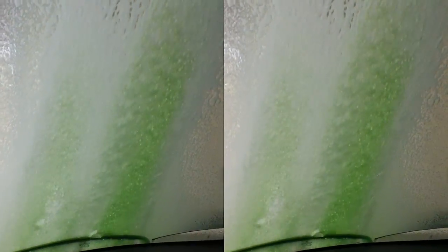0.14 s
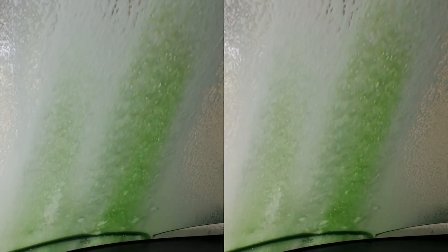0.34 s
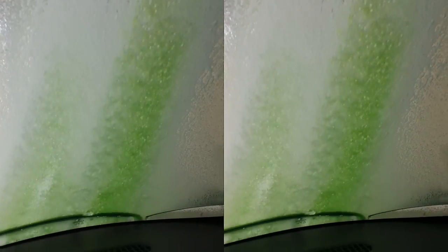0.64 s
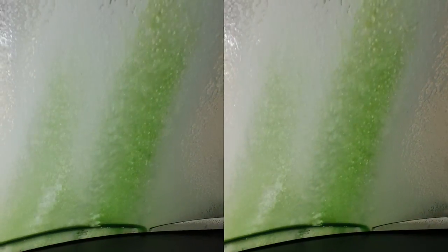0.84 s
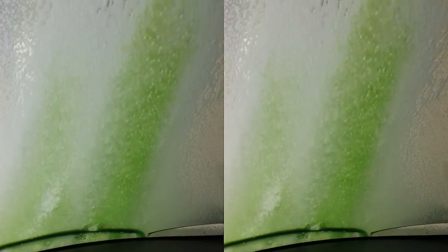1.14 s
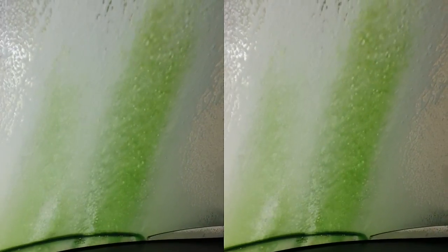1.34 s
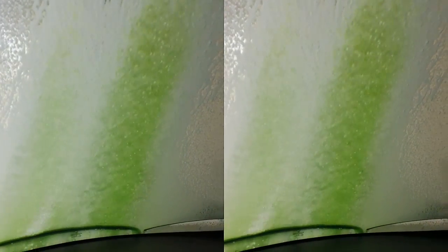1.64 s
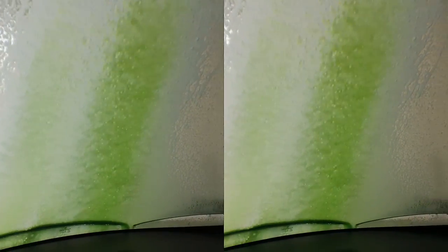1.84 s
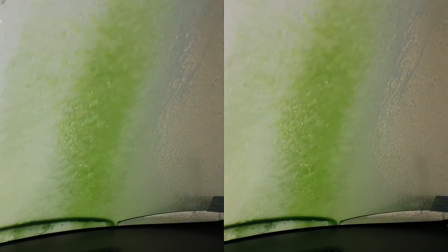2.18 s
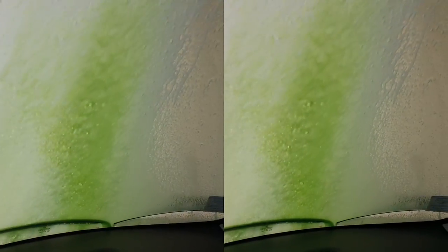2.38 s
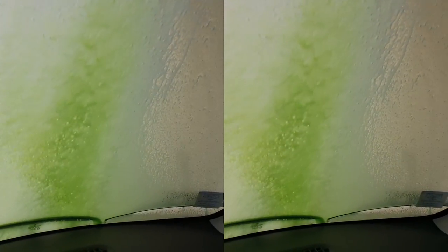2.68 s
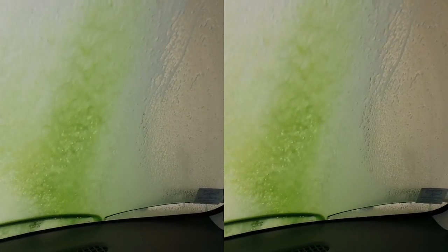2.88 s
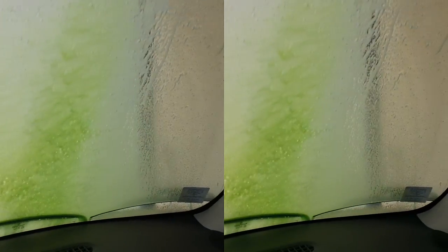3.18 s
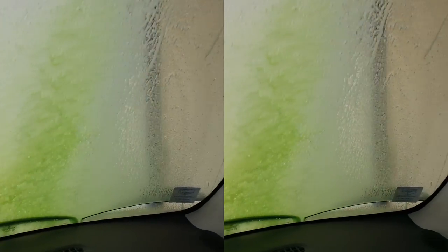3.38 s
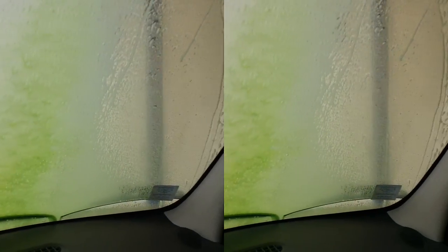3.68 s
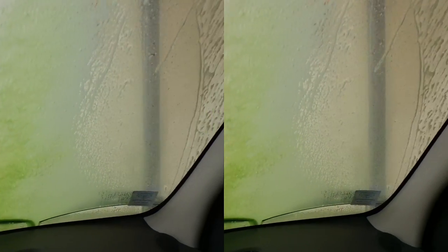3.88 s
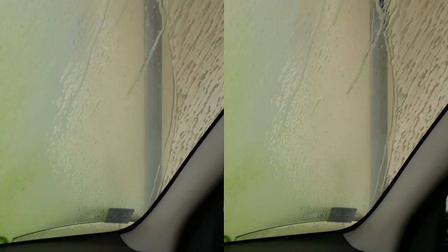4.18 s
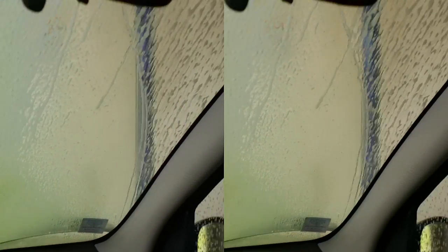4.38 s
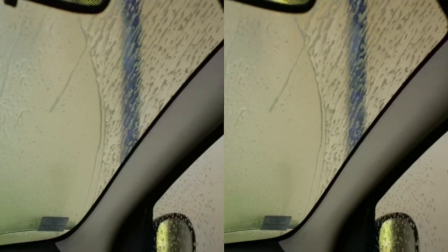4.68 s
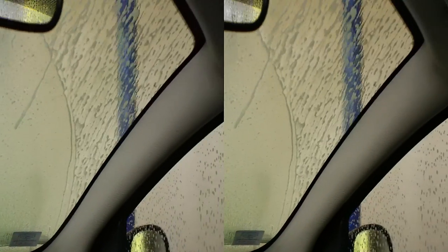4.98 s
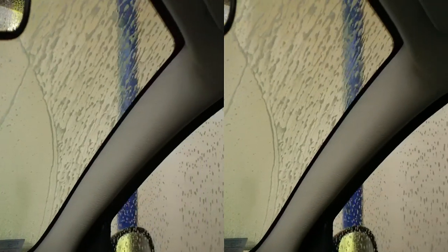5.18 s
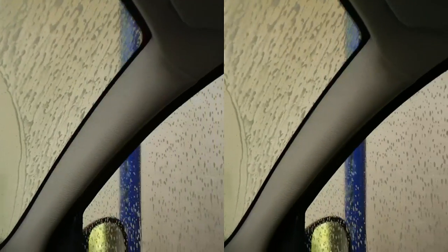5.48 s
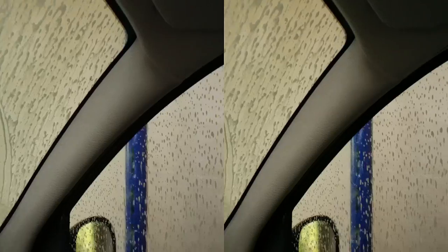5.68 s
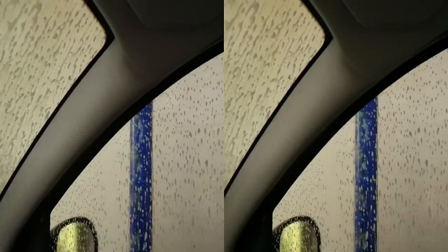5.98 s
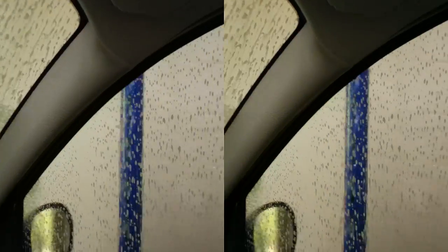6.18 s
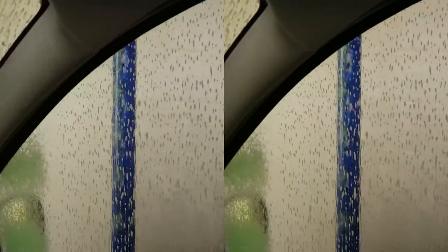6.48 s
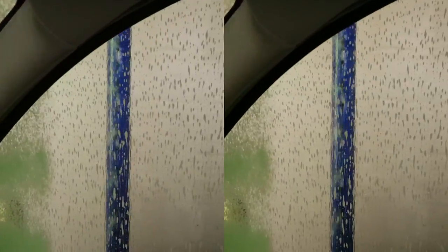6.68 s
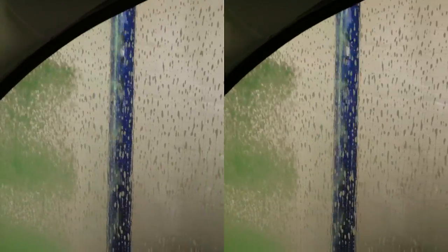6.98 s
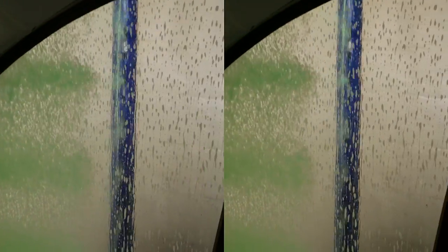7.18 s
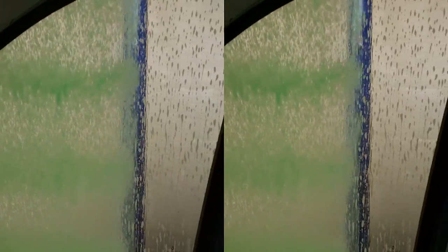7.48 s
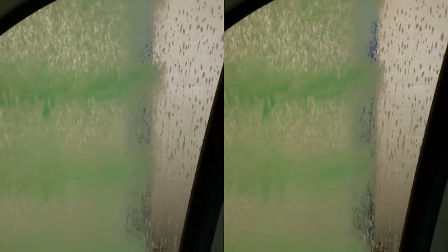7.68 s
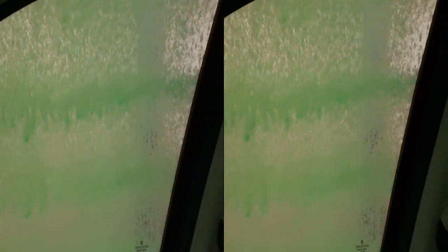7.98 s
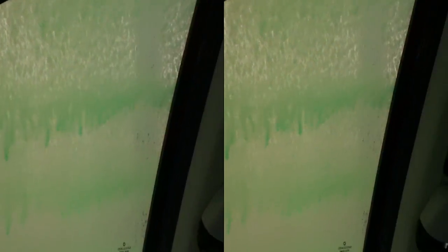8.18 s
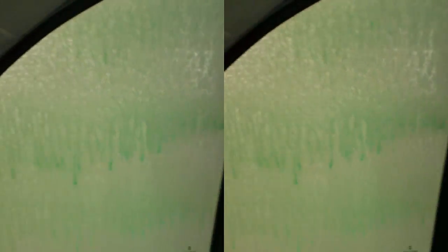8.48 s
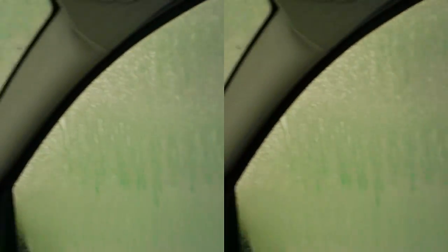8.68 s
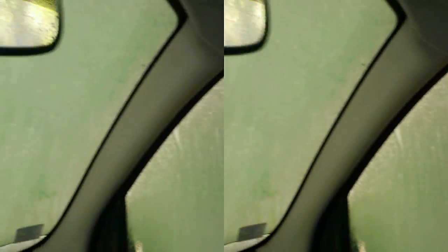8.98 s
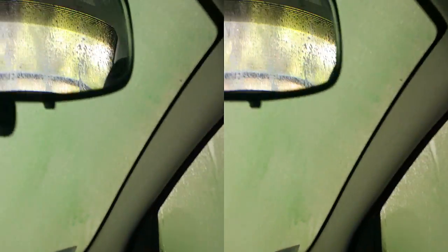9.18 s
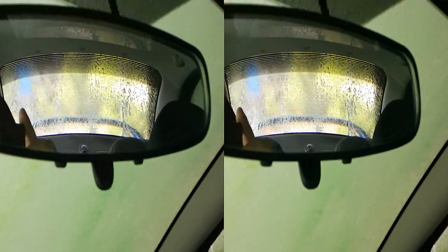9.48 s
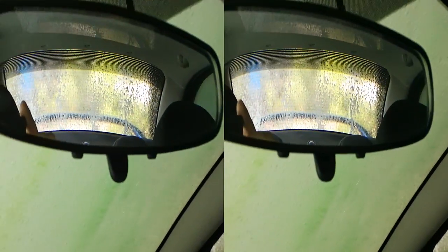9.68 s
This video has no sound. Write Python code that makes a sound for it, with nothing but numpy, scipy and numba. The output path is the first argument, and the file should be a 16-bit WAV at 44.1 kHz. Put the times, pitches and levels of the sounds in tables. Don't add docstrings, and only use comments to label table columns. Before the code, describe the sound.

Heard inside a closed car in a wash bay, water jets drum on the bodywork, then roar and hiss across the side window over a low machine hum.

```python
import sys
import numpy as np
from scipy import signal
from scipy.fft import rfft, irfft, next_fast_len
from scipy.io import wavfile
from scipy.ndimage import uniform_filter1d
from numba import njit

SR = 44100
rng = np.random.default_rng(int(sys.argv[2]) if len(sys.argv) > 2 else 0)


def nominal_scale(level):
    x = np.asarray(level, float) / 20
    return 10 ** x


def store_pcm(level_fs):
    pcm = np.round(np.clip(level_fs, -1, 1) * 32767).astype(np.int16)
    wavfile.write(sys.argv[1], SR, np.atleast_2d(pcm).T)


N = 434385
SIZE = next_fast_len(N)
HZ = np.maximum(np.fft.rfftfreq(SIZE, 1 / SR), 10)
TIME = np.arange(N) / SR

# (time [s], force on sheet metal [dB], force on glass [dB])
SPRAY = [(0, -38, -39), (1.4, -36, -39.5), (2.4, -40.5, -43), (2.9, -41, -46), (3.9, -42, -46),
         (4.95, -41, -47), (5.45, -36.5, -41), (5.68, -36.5, -36), (6.05, -35, -35.5), (6.45, -35.5, -32),
         (6.9, -36, -30.5), (7.2, -29, -31), (8.0, -28.5, -30), (8.27, -28.5, -36), (9.3, -29.5, -35),
         (9.6, -30, -35), (9.85, -34, -35.5)]
# (frequency [Hz], level per third octave [dB], difference of the ports minus their sum [dB])
PANELS = [(61, -29, -3), (121, -15, -16), (308, -3.5, -16), (450, -2, -18.5), (744, 1.5, -13.5),
          (1070, -0.5, -14), (1760, -2, -7), (3060, -18.5, -4), (6000, -42, 0)]
GLASS = [(500, -31, -4), (1080, -8, -14), (1630, -4, -10.5), (2440, 0.5, -6.5), (3830, 2, 0),
         (4290, 1.5, 0.5), (6800, -10, 11), (9600, -38.5, 33.5)]
MIST = [(3000, -26, -6), (4700, 1, 3.5), (6950, 1, 4.5), (9600, -5.5, 19.5), (12440, 5.5, 1.5),
        (16400, -13, 8)]
# (time [s], length [s], pitch [Hz], level [dB], sharpness [Q])
BOOMS = [
    (-.3, 1.56, 540, 6, 2.5),
    (1.5, 4, 630, 6, 2.5),
    (5.55, 0.44, 806, -5, 2.2),
    (6.201, 0.92, 784, -1, 2.5),
    (6.9, .55, 640, 7, 1.7),
    (7.335, 0.39, 370, 11.5, 2.5),
    (7.657, 0.31, 520, 1, 1.4),
    (8.502, .35, 330, -5, 2.5),
    (9.083, 0.7, 727, 11, 6.8),
]


def spray():
    drum_db, hiss_db = curves(SPRAY)
    drum = wash(PANELS, share=0.26, scatter_db=0.5, flicker_db=1.0)
    boom = 0
    for s, length, hz, db, sharpness in BOOMS:
        centre_hz = hz * (1 + 0.027 * walk(3.2))
        ring = np.array([resonance(port, centre_hz, sharpness) for port in drum])
        boom = boom + ring * nominal_scale(db - 13.0) * hold(s, length, 0.24 * length)
    hiss = nominal_scale(hiss_db - 3.0) * wash(GLASS, share=0.12, scatter_db=1.0, flicker_db=0.98)
    near_window_db = 7.5 * hold(6.18, 2.04, 0.14)
    mist_db = -51 + 0.74 * (hiss_db + 35) + near_window_db
    mist = nominal_scale(mist_db + 2.0) * wash(MIST, share=0.082, scatter_db=1.0, flicker_db=1.0)
    return nominal_scale(drum_db - 4.5) * (drum + boom) + hiss + mist


# (time [s], peak level [dB], strongest ring [Hz], brightness [dB])
DROPS = [(0.023, -11.5, 800, -18), (0.127, -12, 786, -10), (0.22, -22, 611, -10), (0.358, -19, 2600, 1),
         (0.389, -23, 720, -21), (0.482, -21, 744, -28), (0.558, -20, 1300, -18), (0.592, -30, 1340, 7),
         (0.836, -18.5, 775, -6), (0.895, -34, 840, -11), (0.927, -16, 1840, -7), (1.035, -13, 1280, -10),
         (1.226, -17, 640, -15), (1.337, -19, 630, -16), (1.39, -23, 684, -19), (1.414, -18, 790, -11)]
# (time [s], peak level [dB], strongest ring [Hz], brightness [dB])
TICKS = [
    (0.852, -21.5, 3340, -13),
    (9.3433, -10.5, 1490, -18),
]
# (frequency [Hz], level [dB])
ROOF = [(525, -8), (786, 1), (1150, 0), (1320, -5), (1810, -4)]
ROOF_TOP = [(2770, -1.5), (3000, 1), (3420, 4), (4400, -27)]


def drops():
    out = np.zeros((2, N + SR))
    t = np.arange(SR // 8) / SR
    strike = t == 0
    dull = signal.butter(2, [400, 2100], "bandpass", fs=SR, output="sos")
    bright = signal.butter(2, [2300, 4300], "bandpass", fs=SR, output="sos")
    snap = signal.butter(1, [1300, 9000], "bandpass", fs=SR, output="sos")
    burst = np.exp(-((t - .002) / .003) ** 2)
    hits = [(*row, -29, 0.039) for row in DROPS] + [(*row, -5.5, 0.033) for row in TICKS]
    for s, db, own_hz, bright_db, crack_db, t60 in hits:
        chance = rng.standard_normal((4, len(t)))
        modes = [(own_hz, 0.0)]
        modes += [(f, g - 3.0) for f, g in ROOF]
        modes += [(f, g + bright_db + 6.0) for f, g in ROOF_TOP]
        hz, gain_db = np.transpose(modes)[:, :, None]
        fade = np.exp(-np.log(1000) * t * (hz / 800) ** 0.087 / t60)
        detune = 1 + 0.034 * chance[0, :len(hz), None]
        ring = -(nominal_scale(gain_db) * np.sin(2 * np.pi * hz * t * detune) * fade).sum(0)
        breakup = strike + 0.11 * chance[2] * np.exp(-t / 0.0027)
        ring = signal.fftconvolve(ring, breakup)[:len(t)]
        slap = chance[3] * np.exp(-t / (0.11 * t60)) - 2.1 * strike
        splash = signal.sosfilt(dull, slap) * nominal_scale(2.5) + signal.sosfilt(bright, slap) * nominal_scale(bright_db + 3.0)
        crack = signal.sosfilt(snap, chance[:2]) * burst * nominal_scale(crack_db + 5.0)
        body = ring / abs(ring).max() * nominal_scale(1.5) + splash
        both = np.array([body, 1.3 * np.gradient(body)])
        i = int(s * SR)
        out[:, i:i + len(t)] += nominal_scale(db + 3.0) * (both + crack * nominal_scale([[0], [1.5]]))
    return out[:, :N]


# (time [s], turn to the side window [0-1])
TURN = [(0, 0), (2.5, 0.04), (4.5, 0.56), (6, 0.99), (7.5, 0), (8.6, 1), (9.85, 0.5)]
# (multiple [of shaft rate], facing ahead [dB], facing the side [dB])
PUMP = [(2.01, -48, -47.5), (4.08, -55, -83), (6.18, -50, -57), (7.07, -45, -57), (7.95, -48, -41.5),
        (9, -54, -82), (10.35, -58, -95), (10.976, -41, -41), (17.0, -50.5, -58), (16.42, -52, -49.5),
        (20.1, -72, -61), (23.77, -60, -91), (23.9, -75, -71), (25.25, -44.5, -49.5), (26.64, -61, -73)]


def pump():
    shaft_hz = 24.3
    turn, = curves(TURN)
    return tones(shaft_hz * TIME, *blend(PUMP, turn), wobble_db=1.0)


# (time [s], turning rate [Hz])
DRIVE = [(0, 39.04), (1.4, 39.05), (1.75, 38.14), (2.7, 38.37), (4.35, 37.73), (5.6, 38.15)]
# (multiple [of turning rate], early level [dB], late level [dB])
DRIVE_TONES = [(2, -49, -47.5), (10, -65, -63)]
# (time [s], length [s], level [dB])
SWELLS = [
    [(.4, 1.56, -41), (2.2, 1.13, -43), (4.1, .5, -46)],
    [(-.3, 1.01, -38.5), (1.65, 1.4, -47.5), (4.25, .4, -48), (5.08, 0.27, -46), (5.5, 0.32, -37)],
    [(.5, 0.83, -47), (1.65, 1.0, -44), (4.7, 0.31, -47)],
    [(.1, 1.66, -43.5), (1.75, 0.93, -41), (3.35, 0.5, -45)],
]


def drive_motor():
    hz, = curves(DRIVE)
    overtones_db = []
    for rows in SWELLS:
        swells = sum(nominal_scale(db) * hold(s, length, 0.27) for s, length, db in rows)
        overtones_db.append(20 * np.log10(nominal_scale(-54) + swells))
    multiples, others_db = blend(DRIVE_TONES, np.clip(TIME / 3.4, 0, 1))
    away_db = -7.0 * np.maximum(TIME - 4.8, 0)
    turns = np.cumsum(hz) / SR
    return nominal_scale(away_db) * tones(turns, [3, 4, 6, 8] + multiples, overtones_db + others_db, wobble_db=2.0)


# (frequency [Hz], level per third octave [dB], difference of the ports minus their sum [dB])
BAY = [(30, -79, -8), (60, -73, 8), (118, -49.5, -2.5), (181, -54, 5.5), (300, -48.5, -1), (440, -53, 5.5),
       (700, -59, 6.5), (1390, -58, 4), (2400, -63, 5), (4200, -54.5, 0), (8200, -61.5, 16),
       (12700, -78, 23), (15900, -30, -12)]


def bay():
    return wash(BAY, share=0.085, scatter_db=1.5, flicker_db=1.0)


def wash(table, share, scatter_db, flicker_db):
    db, apart_db = spectra(table)
    gain = nominal_scale(db) * np.sqrt(SR / 2 / (.2316 * HZ))
    impacts = [droplets(share, scatter_db), droplets(share, scatter_db)]
    pair = rfft(impacts, SIZE) * gain * [HZ ** 0, nominal_scale(apart_db)]
    out = 0
    for octave in range(5, 15):
        window = np.cos(np.clip(np.log2(HZ / 1.4) - octave, -1, 1) * np.pi / 2) ** 2
        out = out + irfft(pair * window, SIZE)[:, :N] * nominal_scale(flicker_db * walk(9))
    return out


def droplets(share, scatter_db):
    size_db = scatter_db * np.minimum(rng.exponential(size=N), 4)
    hits = (rng.random(N) < .03) * rng.standard_normal(N) * nominal_scale(size_db)
    return np.sqrt(1 - share) * rng.standard_normal(N) + np.sqrt(share) * hits / hits.std()


@njit
def resonance(x, hz, sharpness):
    y, band, low, damping = np.empty(len(x)), 0., 0., 1 / sharpness
    for i in range(len(x)):
        g = np.tan(np.pi * hz[i] / SR)
        v = (band + g * (x[i] - low)) / (1 + g * (g + damping))
        band = 2 * v - band
        low = low + 2 * g * v
        y[i] = damping * v
    return y


def tones(turns, multiples, levels_db, wobble_db):
    out = np.zeros((2, N))
    for multiple, db in zip(multiples, levels_db):
        apart_db = min(3.1 * np.log2(multiple) - 23, -8.0)
        phase = 2 * np.pi * (multiple * turns + rng.random((2, 1)))
        out += np.sqrt(2) * nominal_scale(db + wobble_db * walk(5.04)) * np.sin(phase) * nominal_scale([[0], [apart_db]])
    return out


def blend(table, mix):
    multiples = [round(row[0]) for row in table]
    return multiples, [row[1] + mix * (row[2] - row[1]) for row in table]


def curves(table):
    s, *columns = np.transpose(table)
    return [np.interp(TIME, s, c) for c in columns]


def spectra(table):
    hz, *columns = np.transpose(table)
    return [np.interp(np.log(HZ), np.log(hz), c) for c in columns]


def walk(rate):
    k = int(SR / rate)
    steps = np.repeat(rng.standard_normal(N // k + 1), k)
    return uniform_filter1d(uniform_filter1d(steps, k), k)[:N]


def hold(start, length, edge):
    edge = min(edge, length / 2)
    inside = np.minimum(TIME - start, start + length - TIME)
    return np.sin(np.clip(inside / edge, 0, 1) * np.pi / 2) ** 2


def scene():
    mid, side = spray() + drops() + pump() + drive_motor() + bay()
    return np.array([mid + side, mid - side])


# (frequency [Hz], gain [dB], left minus right [dB], lead of the left port [rad])
PORTS = [(25, -20, -2.5, 0), (45, -2.5, -2.5, 0), (200, -4.5, -2, 0.095), (1010, -5, 0.2, 0.2),
         (3400, -4, 0, 0.33), (8050, -6, -1, 0.63), (9200, -20.5, -1.5, 0.079), (9500, -20.5, 7, 0),
         (10130, -38, 3, 0), (10830, -15.5, -6.5, 0.012), (11000, -6.5, -1.5, 0.35), (14450, 0.5, 3, 0.26),
         (15000, -22, -3, 0)]
# (frequency [Hz], level [dB])
CABIN = [(50, 0), (62, 1), (80, -1.5), (99, -2.5), (125, 0), (330, 0), (560, -0.5), (790, 0), (900, .5),
         (1000, -1), (1270, 1), (1420, -1.5), (2000, 0)]


def cabin_and_ports(dry):
    gain_db, pan_db, lead = spectra(PORTS)
    notch_db = -30 * np.exp(-((HZ - 9880) / 480) ** 8)
    left, right = rfft(dry, SIZE) * nominal_scale(gain_db + notch_db + spectra(CABIN)[0])
    skew = nominal_scale(pan_db / 2) * np.exp(.5j * lead)
    return left * skew, right / skew


# (time [s], finest treble common to both ports [dB], treble spread
# between the ports [dB])
TREBLE_BALANCE = [(0, -7.5, -1.5), (1.2, -8.5, -1), (1.7, -6.5, -1.5), (3, -4.5, 0), (5.2, -4, 0),
                  (5.95, -9, -0.5), (6.5, -6, -0.5), (7.2, -2.5, -1), (7.85, -2.5, -2), (8.3, -4.5, 0.8),
                  (9.85, -8, 1)]


def balance_treble(left, right):
    common_db, spread_db = curves(TREBLE_BALANCE)
    common, apart = (left + right) / 2, (left - right) / 2
    common_top = irfft(common * (HZ > 9800) * (HZ <= 15000), SIZE)[:N]
    apart_top = irfft(apart * np.clip(HZ / 1500 - 1, 0, 1), SIZE)[:N]
    cancelled = common * (HZ > 15000)
    x = irfft([left - cancelled, right - cancelled], SIZE)[:, :N]
    x = x + swirl(common, common_db) - common_top
    return x + (nominal_scale(spread_db) - 1) * apart_top * [[1], [-1]]


def swirl(spectrum, common_db):
    out = 0
    for lo in range(9800, 15000, 400):
        band = irfft(spectrum * (HZ > lo) * (HZ <= lo + 400), SIZE)[:N]
        step_db = common_db * (1 + .12 * (lo - 12200) / 1000)
        out = out + band * nominal_scale(4 * walk(40) + step_db)
    return out


def low_pass(x):
    return signal.sosfilt(signal.butter(12, 15400, fs=SR, output="sos"), x)


def record(dry):
    left, right = cabin_and_ports(dry)
    mix = balance_treble(left, right)
    return low_pass(mix)


dry = scene()
out = record(dry)
store_pcm(out)
```